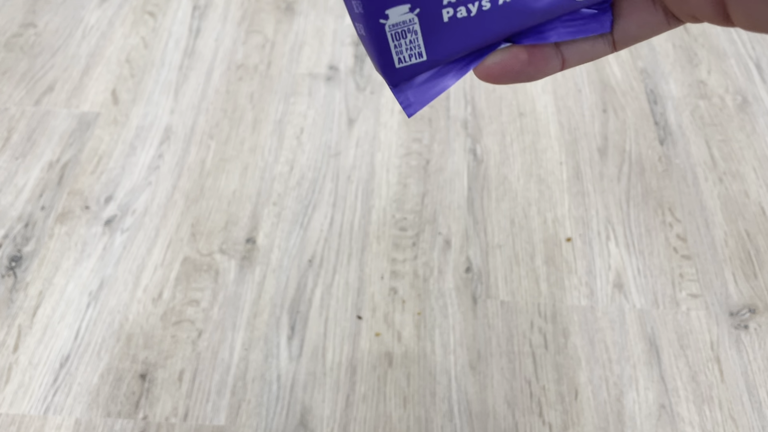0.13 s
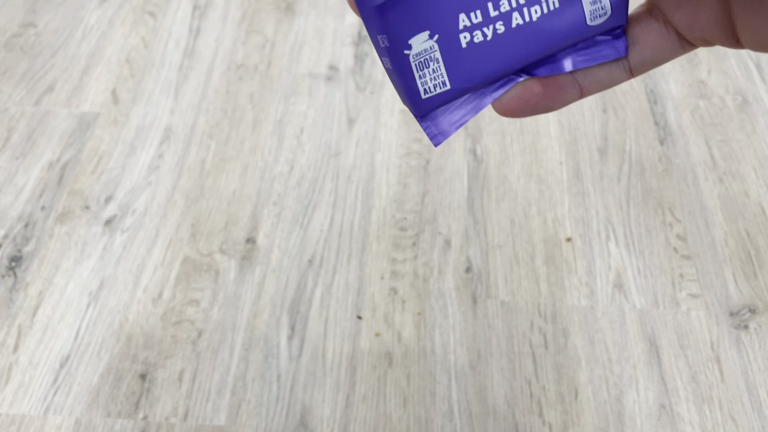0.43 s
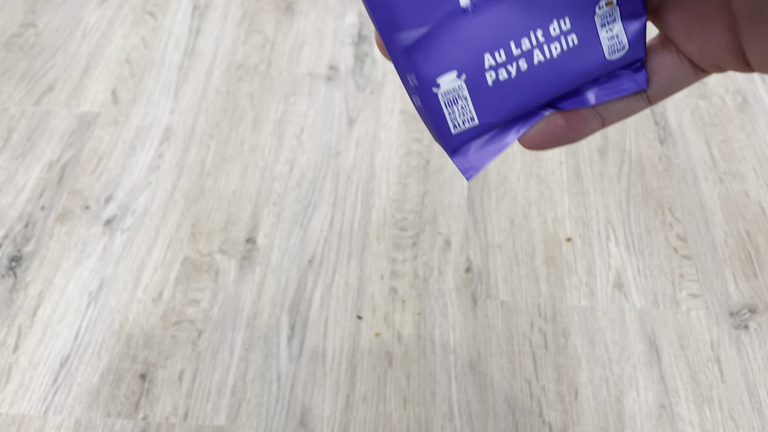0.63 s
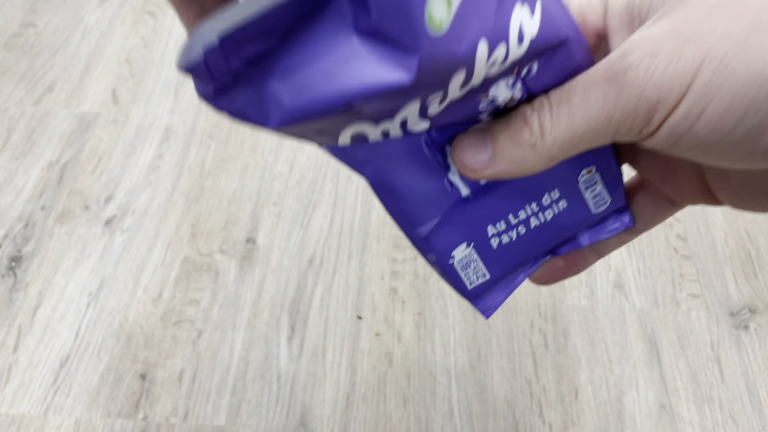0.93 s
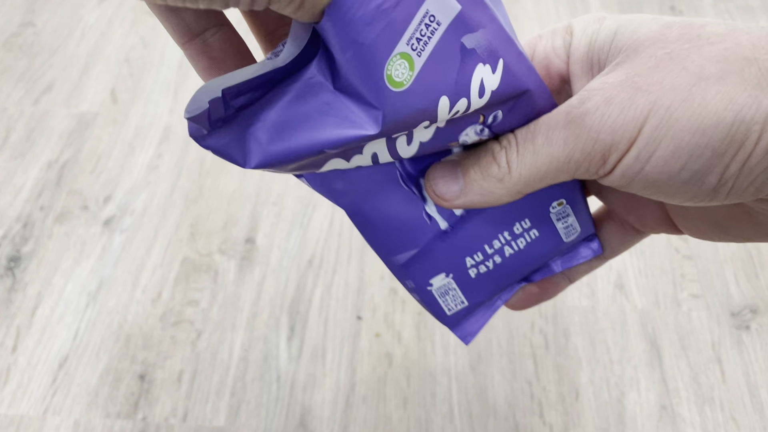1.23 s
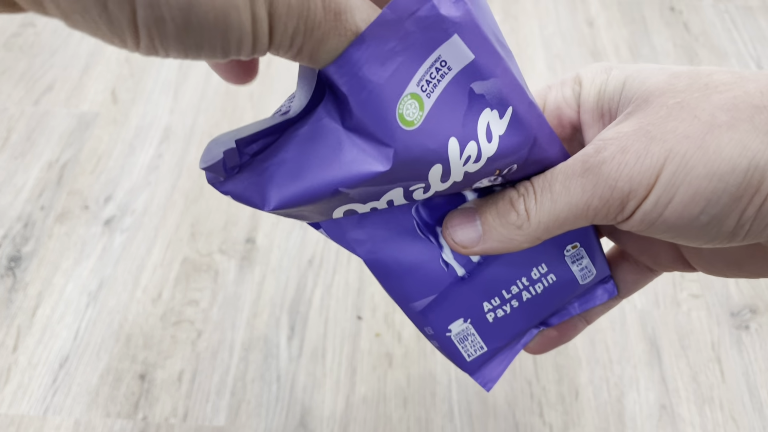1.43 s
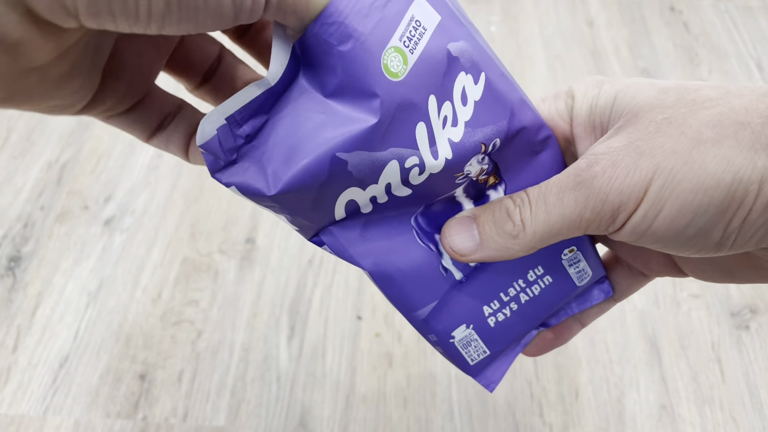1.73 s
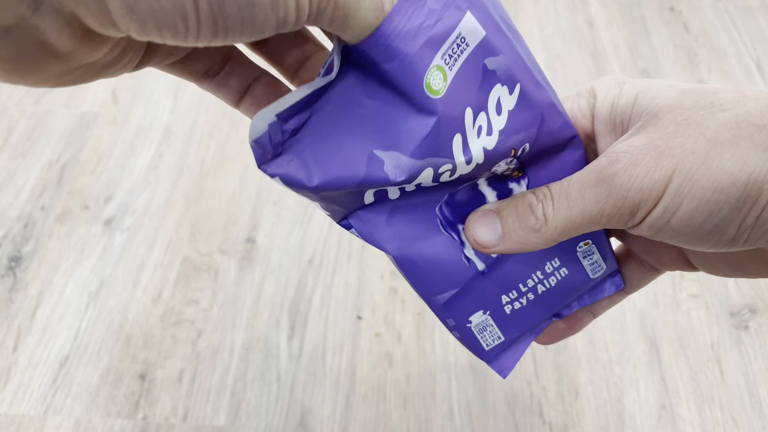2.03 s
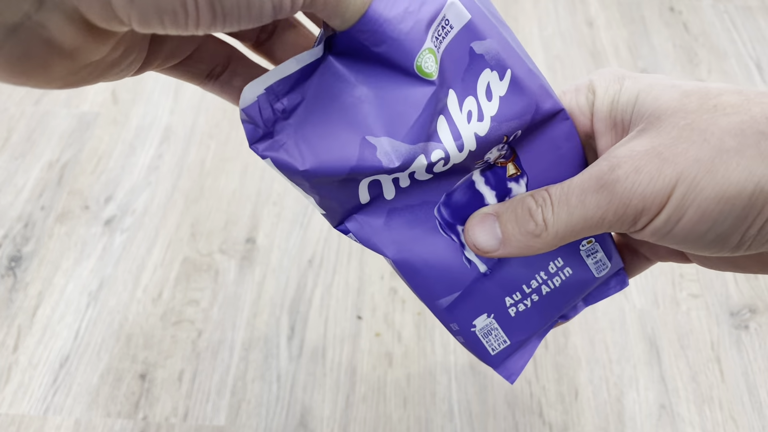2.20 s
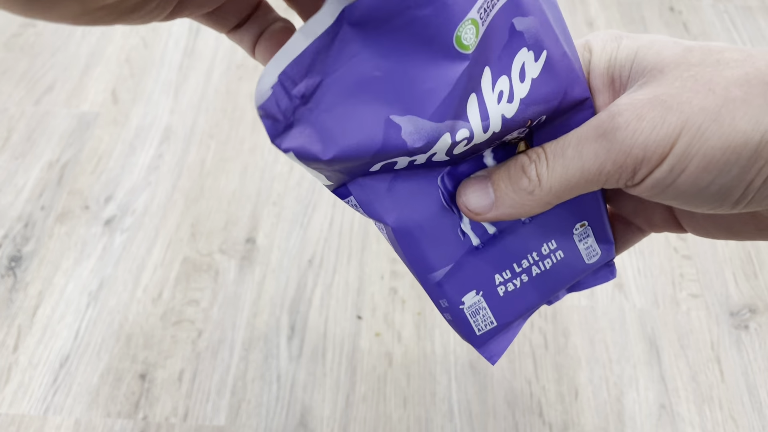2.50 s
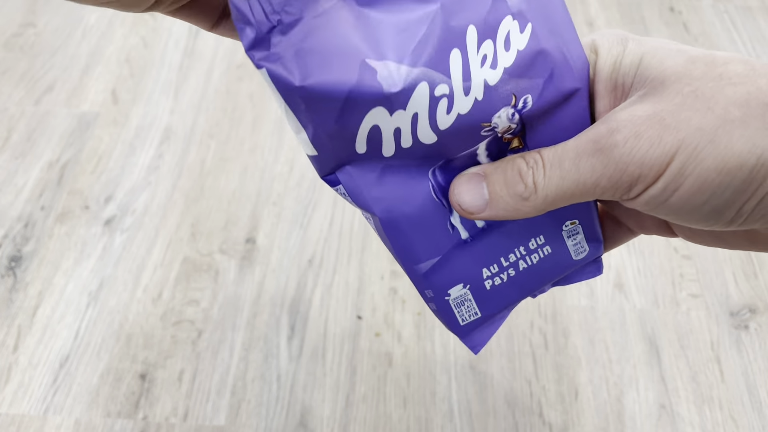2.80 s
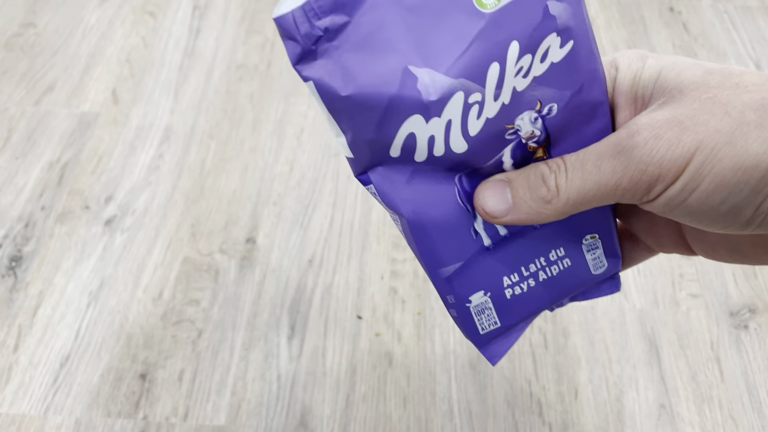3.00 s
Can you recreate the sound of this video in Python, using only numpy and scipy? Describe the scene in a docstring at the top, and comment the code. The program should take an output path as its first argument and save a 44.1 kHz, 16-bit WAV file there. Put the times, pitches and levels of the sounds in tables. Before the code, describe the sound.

A stiff plastic bag crinkles in dense, irregular sharp crackles, handled close in a quiet room.

```python
"""Stiff plastic bag handled in a quiet room

Each crease that snaps is a broadband spike and a short rattle in four film bands; dispersion in the
film makes treble lead and bass trail. Many smaller snaps fill in as crackle. Air squeezed in the bag
puffs as low tones of falling pitch, and the working hands add lumpy low noise. A short decaying room
answer and steady room tone join these at a close microphone with two partly alike ports."""
import sys
import numpy as np
from scipy import signal
from scipy.fft import rfft, irfft, next_fast_len
from scipy.io import wavfile
from scipy.ndimage import map_coordinates

SR = 44100
rng = np.random.default_rng(int(sys.argv[2]) if len(sys.argv) > 2 else 0)


def to_wav(s):
    """Save 16-bit WAV."""
    ch = np.atleast_2d(s).T  # columns
    pcm = np.round(np.clip(ch, -1, 1) * 32767)  # PCM
    wavfile.write(sys.argv[1], SR, pcm.astype(np.int16))


N = 138915  # samples

# Bands of the film: low, ring, high, top; the ring band's centre follows each crease instead.
# Columns: centre f/Hz, width over centre of each filter stage, lateness t/s, swell time t/s
FILM_BANDS = [(586, 2.86, 0.00137, 0.001046), (1920, 0.41, 0.000501, 0.00072),
              (4160, 1.33, 0.0004106, 0.000411), (9540, 2.2, 0.000722, 0.0002916)]
RING = 1  # row of the ring band

SNAP_DB = 5.5  # added to every crease
SPIKE = 0.7  # the break itself over the rattle that follows it
CREEP_DB, CREEP_S = -24, 0.003  # faint rustle as the crease loads, before it breaks
SETTLE_DB, SETTLE_S = -5, 0.0049  # rustle as it settles
LEAD_IN = 256  # samples kept ahead of each break

CRACKLE_COUNT = 1500
CRACKLE_DB, CRACKLE_SPREAD_DB = -7.5, 2
CRACKLE_CAP = 3  # largest small snap, in spreads over the smallest
COLOUR_SPREAD_DB, CRACKLE_PITCH_SPREAD = 4.5, 0.22  # the pitch spread is in natural-log units
CLUMP_DB = 2.5

PUFF_DB = 5  # added to every puff
PUFF_CYCLES, PUFF_SAG = 0.65, 0.8  # swell time in cycles; starting pitch over its value at the peak, less 1
RUMBLE_DB, RUMBLE_LUMPS_DB = -10, 3
TRAIL_S, TRAIL_HZ = 0.0004, 1000  # approximate delay of a bend at this pitch
ROOM_DB, ROOM_DELAY_S = -11, 0.0034
AIR_DB = -54.5
CEILING = 0.88  # full scale = 1
TOP_HZ = 17000


def amp(db):
    """Level in dB to amplitude ratio."""
    return 10 ** (np.asarray(db) / 20)


def unit(x):
    """Signal normalised to a root-mean-square of 1."""
    return x / np.sqrt(np.mean(x ** 2, axis=-1, keepdims=True) + 1e-20)


def along(points, hz):
    """Values interpolated between points on a logarithmic frequency axis."""
    f, v = np.transpose(points)
    return np.interp(np.log(hz + 1), np.log(f + 1), v)


def filtered(x, response):
    """Linear filtering: the spectrum of x times a complex response of frequency."""
    m = next_fast_len(N + SR // 2)
    return irfft(rfft(x, m) * response(np.fft.rfftfreq(m, 1 / SR)), m)[..., :N]


def swell(t, rise_s):
    """Critically damped envelope: a quick rise to 1, then an exponential fall."""
    u = np.maximum(t, 0) / np.maximum(rise_s, 1e-4)
    return u * np.exp(1 - u)


def wobble(rate):
    """Slow random modulation: a smooth curve through rate random knots a second."""
    knots = rng.standard_normal(int(N * rate / SR) + 4)
    return map_coordinates(knots, [np.arange(N) * rate / SR])


def placed(times, sounds, size=0):
    """Superposition: rows of short sounds summed at their times, each starting size samples ahead."""
    at = np.round(times * SR).astype(int)[:, None] + np.arange(sounds.shape[1])
    return np.bincount(at.ravel(), sounds.ravel(), N + SR)[size:N + size]


def handling_db(t, order=1):
    """Common drive of the small sounds: busyness of the hands (order 1) or crackle excess (order 2)."""
    # Work of the hands: t/s, busyness relative level/dB, crackle over its usual share level/dB
    handling = [(0, -42, 0), (.12, -39, 3.5), (.17, -41, -10), (.46, -41.5, 5), (.56, -45, -5.5),
                (.85, -58, 10.5), (.97, -42, -0.5), (1.33, -49, -1.5), (1.5, -52, -8), (1.62, -44.5, -3),
                (1.87, -52.5, 11), (1.94, -46, -1), (2.05, -35.5, -6.5), (2.13, -49, 1), (2.199, -53, 15.5),
                (2.4, -43.5, -4), (2.65, -40, 4), (2.797, -37, -3.5), (2.866, -38, 11), (2.992, -35, -3.5),
                (3.03, -51, -12)]
    rows = np.transpose(handling)
    return np.interp(t, rows[0], rows[order])


def room_tone():
    """Stationary background: noise shaped by a fixed spectrum, independent in the two views."""
    # Spectrum of the room tone: f/Hz, relative level per Hz/dB
    air = [(30, -12.5), (70, 1.5), (200, -46), (1000, -18), (5000, -20), (15000, -58)]
    return unit(filtered(rng.standard_normal((2, N)), lambda hz: amp(along(air, hz))))


def rumble():
    """Amplitude-modulated noise of the hands on the bag: low-frequency, in irregular lumps."""
    # Spectrum of the hand noise: f/Hz, relative level per Hz/dB
    hand_spectrum = [(30, -33), (60, -6), (150, 8.5), (300, -2), (600, -5)]
    spectrum = hand_spectrum + [(2000, -120)]  # fades out above the last point
    noise = unit(filtered(rng.standard_normal((2, N)), lambda hz: amp(along(spectrum, hz))))
    level_db = handling_db(np.arange(N) / SR) + RUMBLE_DB + RUMBLE_LUMPS_DB * wobble(30.97)
    return noise * amp(level_db)


def snapping(times, ring_hz, bands_db, size):
    """Impulsive excitation of band resonances: two views share a spike but rattle independently."""
    t, f = (np.arange(size) - LEAD_IN) / SR, np.fft.rfftfreq(size, 1 / SR)
    noise = rng.standard_normal((len(times), 2, len(FILM_BANDS), size))
    total = np.zeros((len(times), 2, size))
    loading = amp(CREEP_DB) * np.exp(t / CREEP_S) * (1 - t / t[0])
    settling = amp(SETTLE_DB) * np.exp(-t / SETTLE_S) * (1 - t / t[-1])
    rustle = np.where(t < 0, loading, settling)
    for k, (hz, width, late_s, rise_s) in enumerate(FILM_BANDS):
        centre = ring_hz[:, None, None] if k == RING else hz
        damping = 1j * f * centre * width
        band = (damping / (centre ** 2 - f ** 2 + damping)) ** 2  # two equal resonators in series
        shape = swell(t - late_s, rise_s)
        sign = np.sign(noise[:, :1, k, :1])
        # a unit impulse at the peak of the swell, scaled against the rattle
        impulse = np.exp(-2j * np.pi * f * (late_s + rise_s - t[0]))
        spike = SPIKE * np.linalg.norm(shape) * impulse * sign
        rattle = rfft(noise[:, :, k] * (shape + rustle))
        burst = unit(irfft((rattle + spike) * band, size)) * np.sqrt(np.mean(shape ** 2))
        total += burst * amp(bands_db[:, k, None, None])
    return np.array([placed(times, total[:, view], size=LEAD_IN) for view in (0, 1)])


def crackle():
    """Random superposition of small snaps of scattered pitch and colour; level clumps and tracks the hands."""
    # Usual share of each film band in the crackle, in band order: relative level/dB
    crackle_bands_db = [-5.5, -6.5, -5, -3.5]
    times = rng.uniform(0, N / SR, CRACKLE_COUNT)
    clump_db = CLUMP_DB * wobble(40)[(times * SR).astype(int)]
    spreads = np.minimum(rng.exponential(size=CRACKLE_COUNT), CRACKLE_CAP)
    size_db = handling_db(times) + clump_db + CRACKLE_DB + CRACKLE_SPREAD_DB * spreads
    scatter = rng.standard_normal((CRACKLE_COUNT, len(FILM_BANDS)))
    colour_db = COLOUR_SPREAD_DB * scatter + crackle_bands_db
    colour_db = colour_db + handling_db(times, order=2)[:, None]
    ring_hz = FILM_BANDS[RING][0] * np.exp(CRACKLE_PITCH_SPREAD * rng.standard_normal(CRACKLE_COUNT))
    return snapping(times, ring_hz, size_db[:, None] + colour_db, size=640)


def puffs():
    """Air displacement as a panel of the bag flips: a damped low oscillation of falling pitch."""
    # Puffs of air: onset t/s, relative level/dB, pitch at the peak f/Hz
    puff_rows = [(0.018, -36.5, 165), (0.151, -27, 208), (0.172, -29.5, 133), (0.228, -31, 300),
                 (0.285, -47, 280), (0.302, -26.5, 274), (0.385, -35.5, 200), (0.441, -23.5, 227),
                 (0.953, -35.5, 270), (1.264, -39.5, 116), (1.286, -40, 166), (1.325, -33.5, 328),
                 (1.446, -38, 397), (1.633, -45, 278), (1.679, -35, 231), (1.805, -24, 438),
                 (1.83, -28.5, 520), (1.986, -37, 330), (2.28, -42.5, 250), (2.296, -41.5, 304),
                 (2.552, -31, 161), (2.648, -35, 128), (2.704, -29.5, 270), (2.874, -33, 270),
                 (2.98, -31.5, 160)]
    s, db, hz = np.array(puff_rows, float).T[:, :, None]
    cycles = hz * np.arange(4096) / SR
    # integral of a pitch that falls hyperbolically and passes hz at the peak of the swell
    stretch = np.log(1 + PUFF_SAG * cycles / PUFF_CYCLES)
    phase = (1 + PUFF_SAG) * PUFF_CYCLES / PUFF_SAG * stretch
    start = rng.uniform(size=(2, *s.shape))  # each view has its own phase
    push = np.sin(2 * np.pi * (phase + start)) * swell(cycles, PUFF_CYCLES) * amp(db + PUFF_DB)
    return np.array([placed(s[:, 0], view) for view in push])


def creases():
    """Impulsive snapping of the film: each loud snap excites its own mix of the bands."""
    # Loud snaps: t/s, ring pitch f/Hz, then relative level/dB of the low, ring, high and top bands
    snaps = [(0.0265, 1800, -39.5, -40, -67, -44), (0.0758, 2500, -38.5, -47, -65, -45),
             (0.1246, 1770, -30.5, -30, -29.5, -47), (0.135, 970, -25.5, -30, -21, -15.5),
             (0.1486, 2800, -23.5, -35, -43, -17), (0.1617, 2000, -40, -39, -25, -42),
             (0.178, 1750, -21.5, -28, -48, -18), (0.225, 1274, -21.5, -16.5, -11, -10.5),
             (0.246, 2420, -39, -29, -46, -46), (0.2823, 1930, -27, -19.5, -19, -19.5),
             (0.2982, 2860, -43, -31, -75, -24), (0.3095, 1320, -27, -24, -27.5, -23),
             (0.3456, 2800, -33.5, -25, -13.5, -13), (0.3524, 1340, -37, -24, -29, -41),
             (0.3595, 1610, -38, -44, -29, -38), (0.3978, 1260, -26, -44, -30.5, -40),
             (0.419, 3020, -30, -30, -37, -50), (0.424, 1630, -26, -25.5, -41, -18),
             (0.4284, 1810, -35, -19, -28, -14.5), (0.4409, 2750, -17, -26, -22, -33),
             (0.447, 2280, -26.5, -22.5, -27, -11), (0.464, 1820, -54, -21.5, -24, -25),
             (0.4812, 2310, -50, -29, -18.5, -21), (0.5326, 1650, -36.5, -22, -23, -23),
             (0.672, 1850, -46, -41, -40, -64), (0.704, 1200, -35, -41, -38, -48),
             (0.7091, 1440, -29, -26.5, -20, -21), (0.8088, 2660, -49, -39.5, -44, -34.5),
             (0.822, 2620, -74, -41.5, -51, -50), (0.8408, 2930, -57, -45, -35, -45),
             (0.8954, 2780, -40.5, -38, -39, -64), (0.927, 3150, -35.5, -37, -30.5, -60),
             (0.9464, 1960, -28, -30.5, -24, -33), (0.9533, 2320, -28, -25, -17, -11),
             (0.987, 2110, -43, -38, -34, -25.5), (1.0063, 1060, -48, -37, -37, -54),
             (1.041, 1700, -53, -39, -37, -55), (1.0932, 3140, -27.5, -32.5, -19, -13),
             (1.2049, 2280, -43.5, -34, -35.5, -38), (1.2511, 2500, -31, -30.5, -19.5, -14.5),
             (1.2872, 1194, -37, -27, -26.5, -52), (1.3226, 2600, -35, -33.5, -46, -44),
             (1.4046, 1210, -35.5, -37, -39, -65), (1.4945, 1010, -42.5, -39, -84, -51),
             (1.5519, 980, -34.5, -38.5, -67, -63), (1.594, 2200, -40, -30.5, -50, -46),
             (1.6005, 1640, -41, -20.5, -29, -53), (1.611, 3100, -64, -27, -52, -30),
             (1.6354, 2780, -30.5, -25, -37, -15.5), (1.661, 1540, -38.5, -29.5, -27, -25),
             (1.676, 1920, -33, -33.5, -30, -46), (1.6914, 3000, -35, -31, -29, -20.5),
             (1.697, 3060, -37.5, -43, -18, -40), (1.7169, 1650, -37.5, -33.5, -50, -50),
             (1.7377, 3170, -42.5, -31.5, -26.5, -35), (1.7816, 2480, -35, -39, -50, -57),
             (1.7938, 3130, -60, -51, -30.5, -54), (1.8018, 1510, -27, -56, -29, -30),
             (1.8307, 965, -32.5, -38, -51, -48), (1.8463, 2380, -28.5, -27.5, -25, -42),
             (1.973, 1130, -39.5, -41, -44, -60), (2.0004, 1920, -34, -32, -31, -51),
             (2.007, 1940, -40, -30, -36.5, -49), (2.034, 2420, -32.5, -28, -62, -50),
             (2.039, 2250, -28, -26.5, -26.5, -31), (2.1942, 2730, -73, -34.5, -36, -27),
             (2.2775, 2410, -39.5, -32.5, -39, -50), (2.2831, 1300, -35, -31, -43, -54),
             (2.2946, 1520, -25, -29.5, -24, -25), (2.411, 2820, -38, -44, -48, -52),
             (2.4294, 1930, -34.5, -40, -41, -30), (2.448, 1310, -45, -61, -57, -60),
             (2.461, 3540, -39.5, -30.5, -31, -56), (2.519, 1150, -40, -30.5, -28, -46),
             (2.5285, 2470, -35, -30.5, -34, -23.5), (2.5491, 2480, -31, -33, -35, -32.5),
             (2.6252, 1390, -33.5, -30.5, -31, -29), (2.6371, 2850, -37, -33, -52, -47),
             (2.6695, 2320, -44, -38, -57, -51), (2.696, 1120, -38, -36, -52, -55),
             (2.7033, 1100, -28.5, -29, -45, -48), (2.721, 2770, -37, -33, -37, -56),
             (2.764, 1890, -58, -66, -39, -63), (2.7719, 910, -39, -34.5, -56, -63),
             (2.8408, 1990, -32, -33, -29.5, -57), (2.8685, 2740, -36, -22.5, -24.5, -24.5),
             (2.9017, 1750, -41, -22.5, -29, -59), (2.846, 1900, -34.5, -35, -48, -54),
             (2.9453, 1510, -57, -26.5, -19.5, -20.5), (2.9757, 1770, -34, -42, -30, -40),
             (2.982, 1100, -33.5, -32, -24, -52)]
    rows = np.array(snaps)
    return snapping(rows[:, 0], rows[:, 1], rows[:, 2:] + SNAP_DB, size=1024)


def film(x):
    """Bending-wave dispersion: low bends travel slower, so every snap ends in a falling chirp."""
    def trail(hz):
        # all-pass whose delay goes as 1 / (pitch + 100 Hz)
        return np.exp(-2j * np.pi * TRAIL_S * TRAIL_HZ * np.log(1 + hz / 100))
    return filtered(x, trail)


def room(x, count=16):
    """Frequency-dependent reverberation: fresh random tails for each equal stretch of time mix both views."""
    # Decay of the room: f/Hz, 60 dB decay time t/s, relative level/dB
    room_rows = [(200, 0.13, 3), (970, 0.21, -1), (4360, 0.29, -1), (12000, 0.27, -5.5)]
    decay, level = np.array(room_rows)[:, :2], np.array(room_rows)[:, ::2]
    wet = np.zeros_like(x)
    for part in np.array_split(np.arange(N), count):
        hz, t, z = signal.stft(rng.standard_normal((2, 2, SR // 2)), SR, nperseg=256)
        fall_db = along(level, hz)[:, None] - 60 * t / along(decay, hz)[:, None]
        tail = signal.istft(z * amp(fall_db), SR, nperseg=256)[1]
        delay = round(ROOM_DELAY_S * SR)
        tail = np.pad(tail / np.linalg.norm(tail[0]), ((0, 0), (0, 0), (delay, 0)))
        answer = signal.fftconvolve(x[None, :, part], tail, axes=2).sum(axis=1)[:, :N - part[0]]
        wet[:, part[0]:part[0] + answer.shape[1]] += answer
    return wet


def ports(views):
    """Partial coherence: two close ports share one view and hear the other in opposite sign."""
    # Likeness of the ports for independent views: f/Hz, correlation
    alike = [(60, 0.99), (300, 0.88), (700, 0.61), (5500, 0.7), (7500, 0.95), (16000, 0.98)]
    # Phase by which the left port leads: f/Hz, phase/rad
    lead = [(0, 0), (1000, .3), (2700, 1), (4100, .3), (5200, .8), (8100, -3.14), (11400, -6.2),
            (15000, -9.42), (17000, -10)]
    # Left port over right: f/Hz, level/dB
    tilt = [(60, -1), (250, -2), (500, -0.5), (2500, 1.5), (5500, 3), (8000, 0)]

    def shares(hz):
        turn = np.arccos(np.clip(along(alike, hz), 0, 1)) / 2
        return [np.cos(turn), np.sin(turn)]

    def left_right(hz):
        # half the difference goes to each port
        half = amp(along(tilt, hz) / 2) * np.exp(0.5j * np.interp(hz, *np.transpose(lead)))
        return [half, 1 / half]

    mid, side = filtered(views, shares)
    return filtered(np.array([mid + side, mid - side]), left_right)


def scene():
    """Superposition of the bag, its room answer and the room tone at the two ports."""
    bag = film(creases() + crackle()) + puffs() + rumble()
    air = room_tone()
    return ports(bag + amp(ROOM_DB) * room(bag) + amp(AIR_DB) * air)


def record(dry):
    """Transducer response: microphone colour, soft saturation, then the band limit."""
    # Colour of the microphone: f/Hz, level/dB
    mic = [(30, -1), (70, -1), (1000, -1.5), (6000, -1.5), (11000, -2), (13500, -9), (15500, -5.5),
           (16500, -24)]
    x = filtered(dry, lambda hz: amp(along(mic, hz)))
    limited = x / (1 + np.abs(x / CEILING) ** 6) ** (1 / 6)
    return filtered(limited, lambda hz: hz < TOP_HZ)


dry = scene()
out = record(dry)
to_wav(out)
```